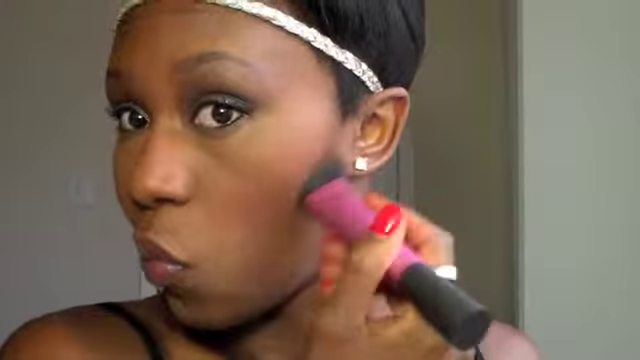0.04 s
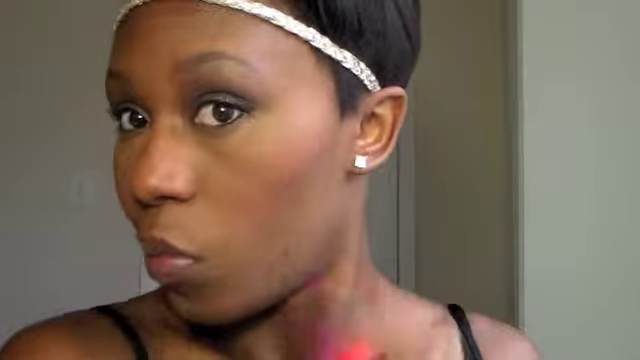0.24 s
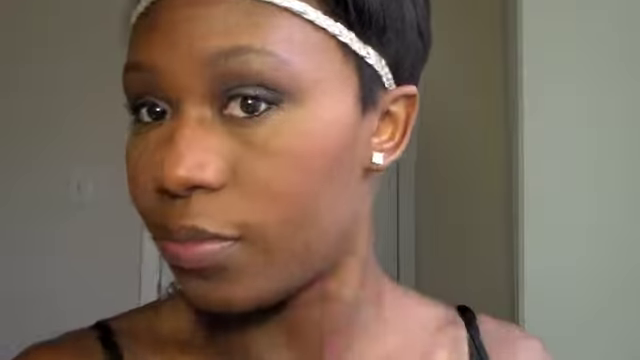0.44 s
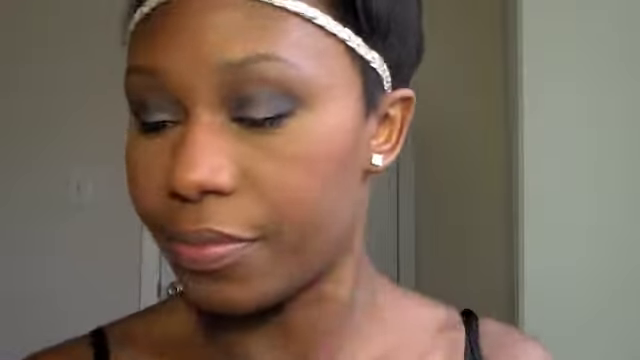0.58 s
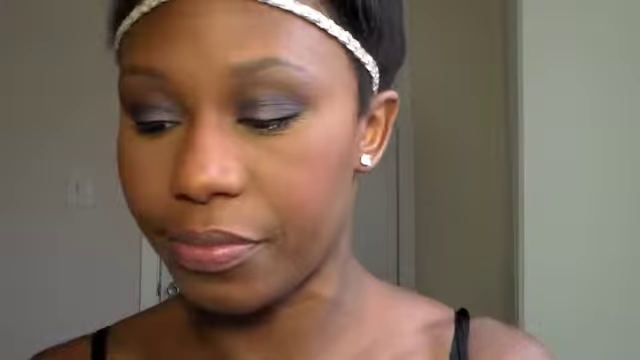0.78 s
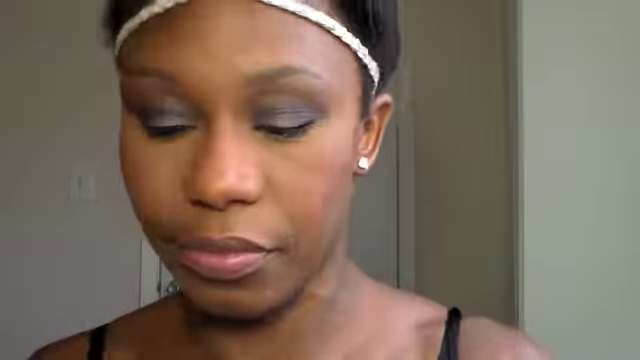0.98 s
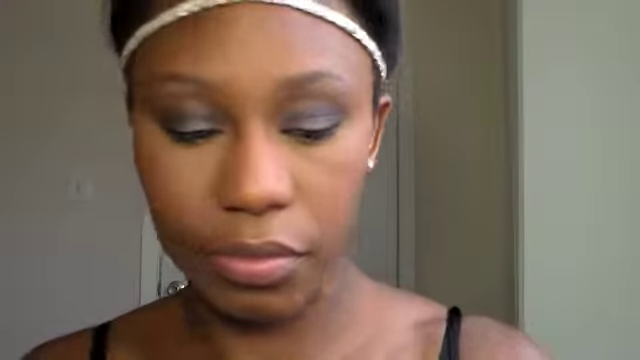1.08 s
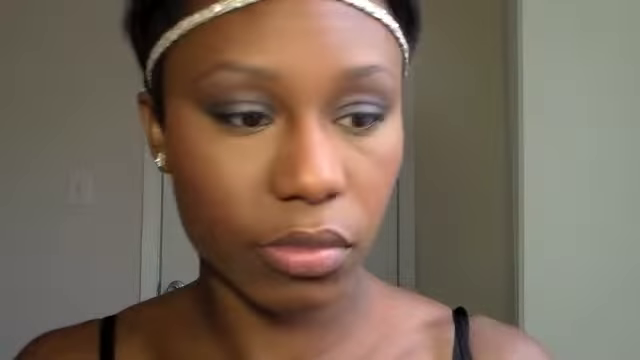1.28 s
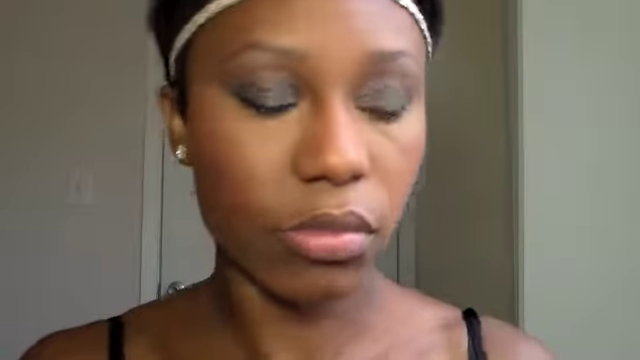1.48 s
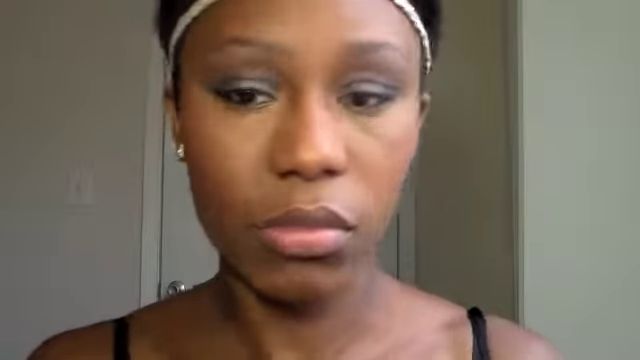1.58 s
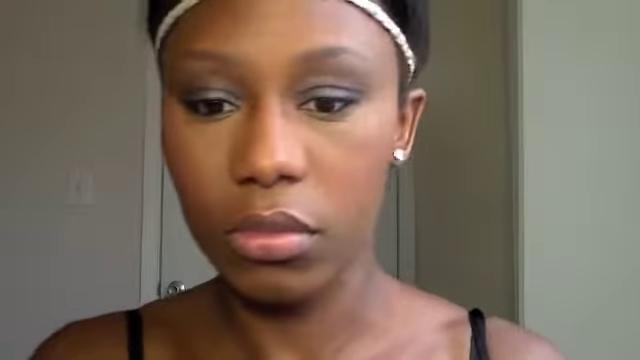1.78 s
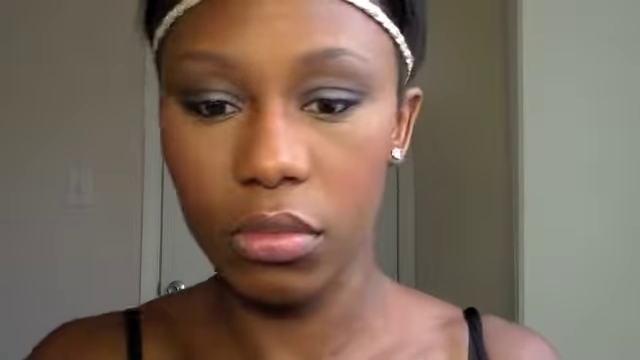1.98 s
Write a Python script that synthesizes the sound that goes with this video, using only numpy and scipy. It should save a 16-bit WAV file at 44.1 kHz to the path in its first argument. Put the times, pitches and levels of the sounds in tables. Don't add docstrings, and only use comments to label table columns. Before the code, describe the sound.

Small plastic makeup items click and knock on a wooden table, close-miked in a small, lightly echoing room. Faint finger ticks come at 0.15-0.85 s over a low, airy fan hum. A brush taps down around 1.03 s, a bright snap cracks at 1.16 s, and the volume ducks. A hollow pot clunks and rocks at 1.5 s, a lid clicks sharply at 1.63 s, then the hum swells back.

```python
import sys
import numpy as np
from scipy import signal
from scipy.fft import rfft, irfft
from scipy.io import wavfile
from scipy.ndimage import uniform_filter1d, map_coordinates

SR = 44100
rng = np.random.default_rng(int(sys.argv[2]) if len(sys.argv) > 2 else 0)


def natural_amplitude(level_db):
    exponent = np.asarray(level_db, float) / 20
    return 10 ** exponent


def output_pcm(signal):
    pcm = np.clip(np.atleast_2d(signal).T, -1, 1) * 32767
    wavfile.write(sys.argv[1], SR, np.round(pcm).astype(np.int16))


N = 90052


def read(table, hz, column=1):
    rows = np.array(table, float)
    return np.interp(np.log(np.maximum(hz, 1)), np.log(rows[:, 0]), rows[:, column])


def unit(x):
    return x / np.sqrt(np.mean(x ** 2))


def coloured(x, table):
    size = x.shape[-1]
    hz = np.arange(size // 2 + 1) * SR / size
    return irfft(rfft(x) * natural_amplitude(read(table, hz)), size)


def walk(size):
    held = np.repeat(rng.standard_normal(N // size + 1), size)
    return uniform_filter1d(held, size)[:N]


def ring(x, hz, width):
    r = np.exp(-np.pi * width / SR)
    w = 2 * np.pi * min(hz, SR / 2.2) / SR
    return signal.lfilter([0, np.sin(w)], [1, -2 * r * np.cos(w), r * r], x)


def ports(mid, other):
    # pitch_hz, side_minus_mid_db
    port_contrast = [(60, -16), (500, -16.5), (1500, -12.5), (4000, -4.5), (8000, 0.3), (13000, 1)]
    side = coloured(other, port_contrast)
    return np.array([mid + side, mid - side])


def fan():
    # pitch_hz, level_db (per Hz)
    air_colour = [(15, -39.5), (25, -5.5), (119, -10), (278, -16.5), (584, -21.5), (892, -22.5),
                  (1400, -28.5), (1870, -31), (14000, -47)]
    # pitch_hz, width_hz, level_db
    duct = [(58, 7.9, -55.5), (114.8, 6.3, -55.5), (172.4, 18, -62), (456, 91, -60), (562, 69, -56.5),
            (1433, 220, -60.5), (2600, 67, -72)]
    # multiple (of shaft pitch), level_db
    shaft = [(1, -57), (2, -49.5), (3, -69), (4, -54.5)]
    air_db, flicker_db = -48, 0.7
    shaft_hz, shaft_wobble, hum_waver_db = 28.88, 0.018, 3.0
    flicker = walk(size=2000)
    pair = []
    for _ in range(2):
        air = natural_amplitude(air_db + flicker_db * flicker) * unit(coloured(rng.standard_normal(N), air_colour))
        for hz, width, db in duct:
            air = air + natural_amplitude(db) * unit(ring(rng.standard_normal(N), hz, width))
        pair.append(air)
    turn = 2 * np.pi * np.cumsum(shaft_hz * (1 + shaft_wobble * walk(size=6000))) / SR
    hum = 0
    for multiple, db in shaft:
        wave = np.sqrt(2) * np.sin(multiple * turn + rng.uniform(0, 2 * np.pi))
        hum = hum + natural_amplitude(db + hum_waver_db * walk(size=4000)) * wave
    return ports(*pair) + hum


def contact(ms, count):
    rise_share = 0.12
    t = np.arange(2048) / SR * 1000 / ms
    shape = (1 - np.exp(-(t + 0.025) / rise_share)) * np.exp(-t)
    push = rng.standard_normal((count, 2048))
    for _ in range(6):
        spec = rfft(push * shape)
        push = irfft(spec / np.abs(spec))
        push = push / np.sqrt(uniform_filter1d(push ** 2, size=12) + 1e-12)
    return irfft(spec / np.sqrt(uniform_filter1d(np.abs(spec) ** 2, size=24)))


def steep(hz, width):
    gain = np.abs(rfft(ring(np.arange(2048) == 0, hz, width)))
    return gain ** 1.6 / gain.max() ** 0.6


def causal(gain):
    cep = irfft(np.log(gain))
    forward = np.r_[1, 2 * np.ones(1023), 1, np.zeros(1023)]
    return irfft(np.exp(rfft(cep * forward)))


def strike(start_s, hit_db, contact_ms, left_lag, body, crack, crack_db):
    direct_side_db = -9
    rings = np.sqrt(sum((natural_amplitude(db) * steep(hz, width)) ** 2 for hz, width, db in body))
    snap = natural_amplitude(crack_db) * unit(natural_amplitude(read(crack, np.arange(1025) * SR / 2048)))
    response = causal(np.hypot(unit(rings), snap))
    mid, side = (np.convolve(push, response)[:2048] for push in contact(contact_ms, count=2))
    pair = 4.5 * ports(mid, natural_amplitude(direct_side_db) * side)
    out = np.zeros((2, N))
    start = int(start_s * SR)
    for ch, shift in enumerate((left_lag / 2, -left_lag / 2)):
        shifted = map_coordinates(np.roll(pair[ch], 8), [np.arange(2048) - shift])
        out[ch, start - 8:start + 2040] = natural_amplitude(hit_db) * shifted
    return out


def strikes(hits, body, crack, crack_db):
    return sum(strike(*hit, body, crack, crack_db) for hit in hits)


def small_ticks():
    # start_s, level_db, low_ring_hz, high_ring_hz,
    # high_ring_db
    touches = [(.158, -35, 2700, 5760, -3), (0.224, -50, 8000, 10800, 3), (0.2579, -29, 2070, 6960, 7),
               (0.2662, -43, 7140, 9300, -1), (0.4141, -46, 4300, 6500, 1), (0.5189, -45.5, 4500, 9000, -2),
               (0.8081, -34, 1650, 4000, -0.5), (0.8387, -43, 3500, 4480, -5), (1.036, -29, 3400, 7200, -6),
               (1.5106, -12, 2600, 4200, 3), (1.516, -22, 2500, 5100, -8), (1.519, -11.5, 3550, 4400, -4)]
    # pitch_hz, level_db (per Hz)
    tick_crack = [(500, -28), (1500, -4), (3000, -7), (7000, -2), (10000, -11), (14000, -15)]
    contact_ms, left_lag, sharpness, crack_db = 1.6, 1.0, 5, -8
    out = 0
    for start_s, db, low, high, high_db in touches:
        body = [(low, low / sharpness, 0), (high, high / sharpness, high_db)]
        out = out + strike(start_s, db, contact_ms, left_lag, body, tick_crack, crack_db)
    return out


def brush():
    # start_s, level_db, contact_ms, left_lag_samples
    brush_hits = [
        (1.0217, -17, 2.5, 0.34),
        (1.0434, -16, 0.81, -0.66),
        (1.0185, -36, 1.7, .3),
        (1.1363, -21.5, 1.3, -0.61),
    ]
    # pitch_hz, width_hz, level_db
    soft_body = [(980, 130, -1.5), (1830, 200, -2), (4870, 150, -8), (9300, 230, -15)]
    hard_body = [(990, 160, -5), (1820, 300, -9), (3100, 350, -10), (2310, 190, -9.5), (4830, 450, -11),
                 (5940, 350, -5)]
    # pitch_hz, level_db (per Hz)
    soft_crack = [(88, -41), (150, -9), (1840, 0), (3500, -11.5), (4930, -12), (6310, -20), (9400, -18),
                  (14000, -42)]
    hard_crack = [(88, -43), (150, -21.5), (1000, -5), (3190, -7.5), (4160, -14.5), (4840, -3),
                  (5320, -11.5), (14000, -27.5)]
    soft = strikes(brush_hits[:1], soft_body, soft_crack, crack_db=-3.5)
    return soft + strikes(brush_hits[1:], hard_body, hard_crack, crack_db=0)


def case_snap():
    # start_s, level_db, contact_ms, left_lag_samples
    snap_hits = [
        (1.1605, -19.5, 0.74, -0.97),
        (1.1617, -5, 0.78, -0.9),
    ]
    # pitch_hz, width_hz, level_db
    case_body = [(2700, 1100, -3.5), (5780, 400, -3), (7700, 600, -4)]
    # pitch_hz, level_db (per Hz)
    snap_crack = [(88, -66), (150, -25.5), (2690, 3), (5960, -8), (6680, -9.5), (7630, -3), (11800, -13.5),
                  (14000, -16.5)]
    return strikes(snap_hits, case_body, snap_crack, crack_db=4.5)


def pot():
    # start_s, level_db, contact_ms, left_lag_samples
    pot_hits = [
        (1.4933, 2.5, 2.8, -1),
        (1.5045, -7, 3.23, -1),
        (1.5135, -10.5, 4.0, -0.83),
        (1.5205, -1, 5.4, -1.1),
        (1.538, -7.5, 4.9, -.6),
    ]
    # pitch_hz, width_hz, level_db
    pot_body = [(324, 130, -6), (450, 150, -1), (580, 170, -9), (1420, 230, -2)]
    # pitch_hz, level_db (per Hz)
    pot_crack = [(88, -40), (150, -31.5), (402, -1), (812, -16.5), (1410, -11.5), (2060, -16.5),
                 (4320, -22.5), (14000, -42)]
    return strikes(pot_hits, pot_body, pot_crack, crack_db=1.5)


def lid():
    # start_s, level_db, contact_ms, left_lag_samples
    lid_hits = [
        (1.629, -23, 0.76, 0.67),
        (1.6313, 0.5, 0.43, 1),
    ]
    # pitch_hz, width_hz, level_db
    lid_body = [(317, 96, -11.5), (458, 102, -7), (2060, 310, -4.5), (4200, 760, -3.5)]
    # pitch_hz, level_db (per Hz)
    lid_crack = [(150, -13), (400, 0.5), (1000, -5.5), (4200, -0.5), (5600, -7), (7400, -14), (9500, -10.5),
                 (14000, -27)]
    return strikes(lid_hits, lid_body, lid_crack, crack_db=-0.25)


def items():
    hits = small_ticks() + brush() + case_snap() + pot() + lid()
    return signal.sosfilt(signal.butter(4, 210, "high", fs=SR, output="sos"), hits)


def room(x):
    # pitch_hz, fade_s (time to fall 60 dB), level_db
    room_tail = [(248, 0.24, -17), (487, 0.32, -13.5), (940, 0.52, -12), (2000, 0.46, -18.5),
                 (4000, 0.43, -20.5), (8000, 0.42, -20), (13400, 0.3, -11)]
    rise_s = 0.0014
    wall_s, wall_db, wall_smear_ms, wall_low_hz = 0.0100, -12, 1.8, 900
    t = np.arange(SR // 2) / SR
    noise = rfft(rng.standard_normal((2, len(t))))
    octave = np.log2(np.maximum(np.arange(noise.shape[1]) * 2, 1))
    centres = np.log2(np.array(room_tail)[:, 0])
    tail = 0
    for k, (hz, fade_s, db) in enumerate(room_tail):
        share = np.interp(octave, centres, np.arange(len(room_tail)) == k)
        band = irfft(noise * share, len(t))
        tail = tail + natural_amplitude(db - 60 * t / fade_s) * band / 10
    tail = tail * (1 - np.exp(-t / rise_s))
    wall = np.pad(contact(wall_smear_ms, count=2), ((0, 0), (0, len(t) - 2048)))
    wall = np.roll(wall, int(wall_s * SR), axis=1)
    tail = tail + natural_amplitude(wall_db) * signal.lfilter(*signal.butter(1, wall_low_hz, "high", fs=SR), wall)
    return signal.fftconvolve(x.mean(axis=0)[None], ports(*tail), axes=1)[:, :N]


def scene():
    hits = items()
    return hits + room(hits) + fan()


def roll_off(x):
    return signal.sosfilt(signal.butter(12, 15290, fs=SR, output="sos"), x)


def record(dry):
    # time_s, gain_db
    volume = [
        (0, 0),
        (1.029, 1),
        (1.152, -6),
        (1.174, -13),
        (1.22, -17),
        (1.3, -18),
        (1.48, -15.5),
        (1.702, -12),
        (1.85, -2),
        (2.05, -0.5),
    ]
    hiss_db, limit, left_bass_db = -66, 0.75, 1.5
    time_s, gain_db = np.array(volume).T
    gain = natural_amplitude(np.interp(np.arange(N) / SR, time_s, gain_db))
    x = dry * gain + natural_amplitude(hiss_db) * rng.standard_normal(dry.shape)
    x = limit * np.tanh(x / limit)
    bass = signal.lfilter(*signal.butter(1, 400, fs=SR), x[0])
    x = np.array([x[0] + (natural_amplitude(left_bass_db) - 1) * bass, x[1]])
    x = signal.sosfilt(signal.cheby1(12, 0.5, 14150, fs=SR, output="sos"), x)
    return roll_off(x)


dry = scene()
out = record(dry)
output_pcm(out)
```